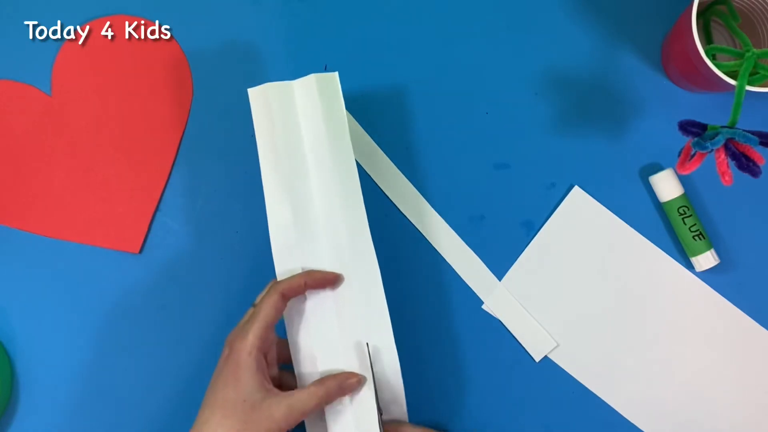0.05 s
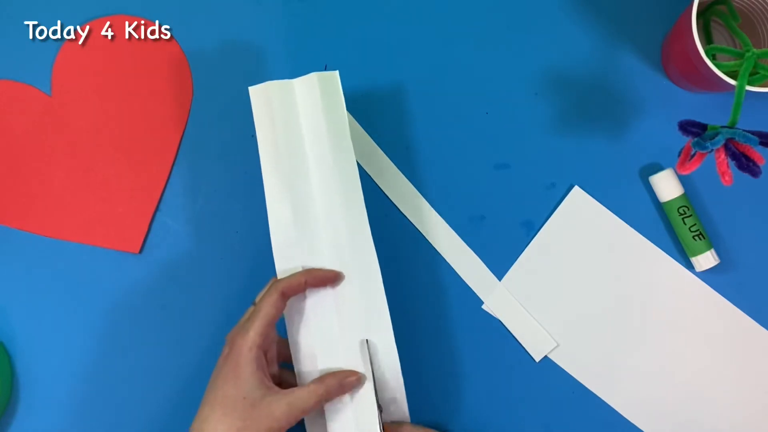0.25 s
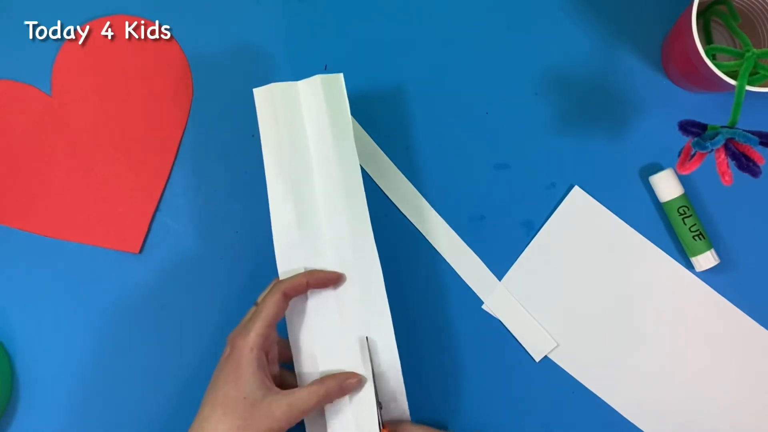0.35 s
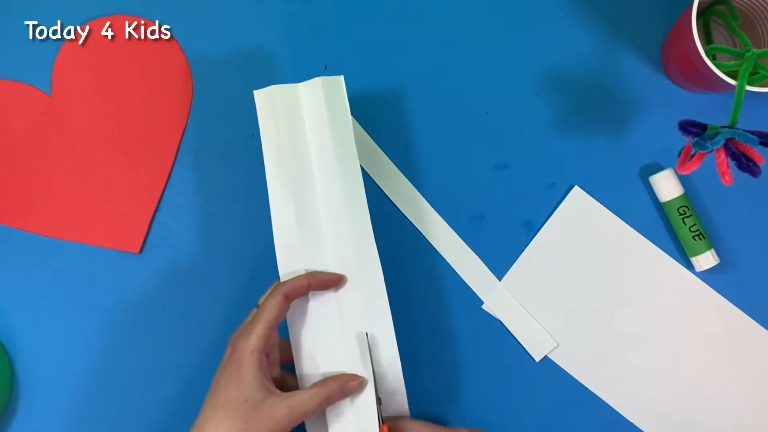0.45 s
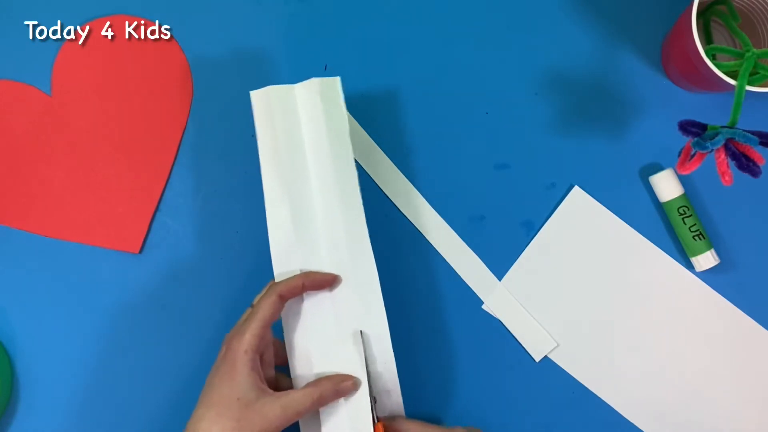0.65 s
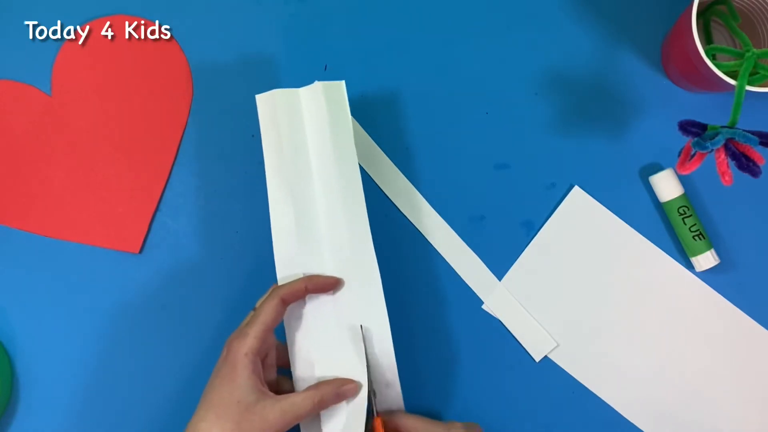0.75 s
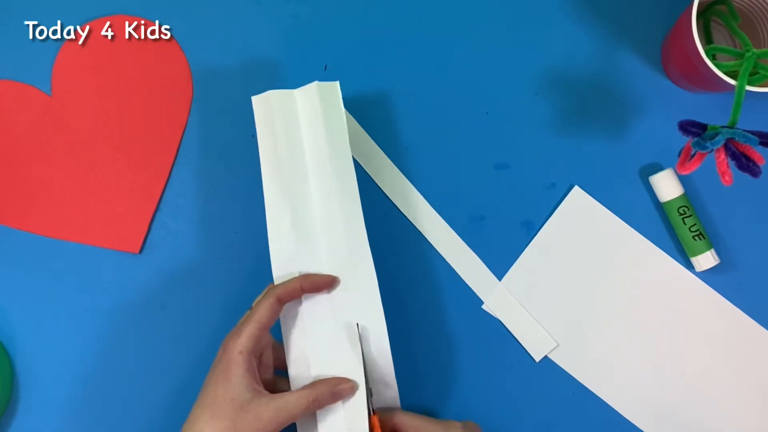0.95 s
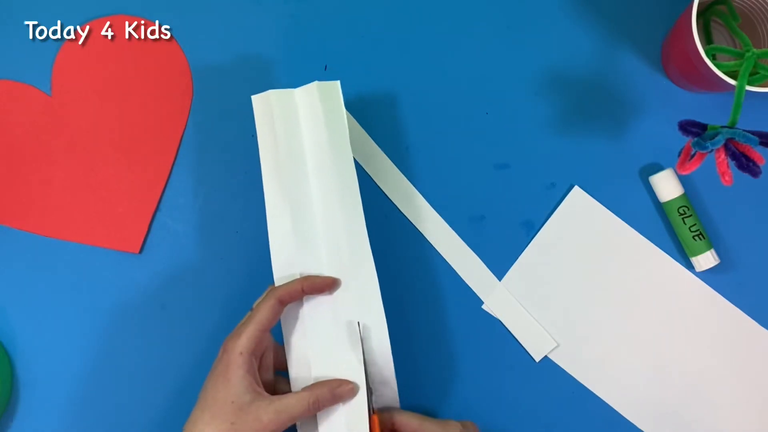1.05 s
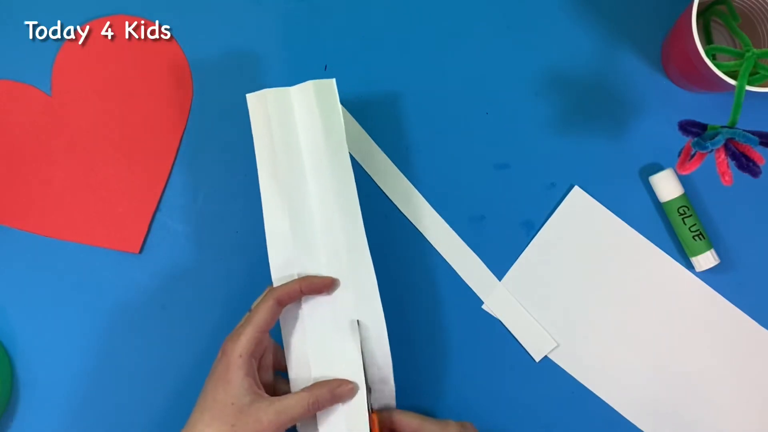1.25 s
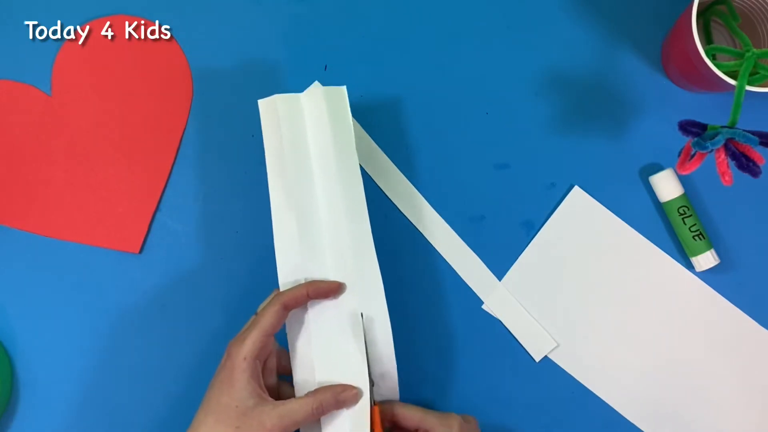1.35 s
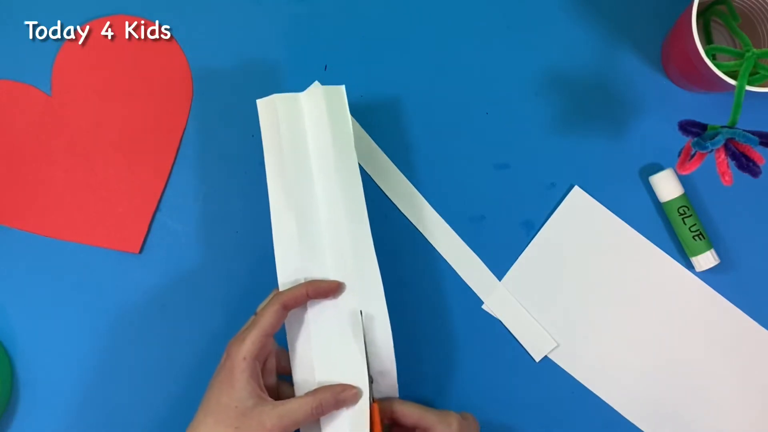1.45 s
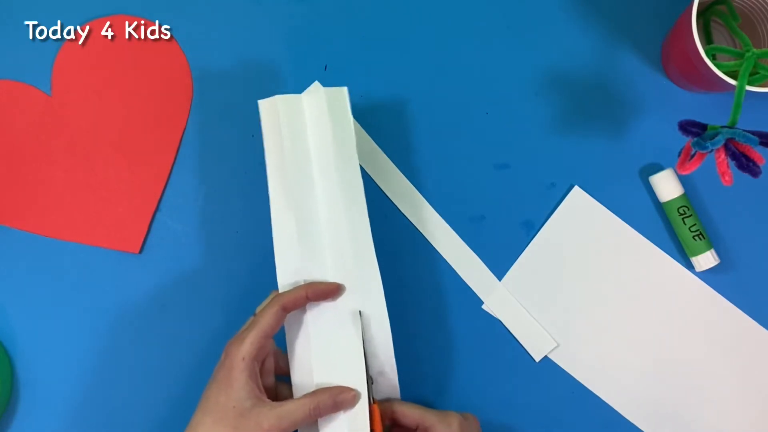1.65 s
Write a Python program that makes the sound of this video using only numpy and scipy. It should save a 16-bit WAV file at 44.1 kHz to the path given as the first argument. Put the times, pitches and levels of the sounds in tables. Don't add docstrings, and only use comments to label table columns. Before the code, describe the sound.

Scissors snip through folded paper in crisp irregular cuts, with metallic scrapes and one loud clack.

```python
import sys
import numpy as np
from scipy import signal
from scipy.fft import rfft, irfft, next_fast_len
from scipy.io import wavfile
from scipy.ndimage import uniform_filter1d

SR = 44100
rng = np.random.default_rng(int(sys.argv[2]) if len(sys.argv) > 2 else 0)


def elevation(decibels):
    levels = np.asarray(decibels, float)
    return 10 ** (levels / 20)


def generate_wav(sig):
    pcm = np.round(np.clip(np.atleast_2d(sig).T, -1, 1) * 32767).astype(np.int16)
    wavfile.write(sys.argv[1], SR, pcm)


N = 74970
T = np.arange(N) / SR

# (frequency [Hz], level [dB])
SCRAPE_COLOUR = [(150, -55), (350, -5.5), (1500, -0.5), (2700, -8), (4000, -5), (7500, -14), (9000, -12),
                 (16000, -17)]


def unit(x):
    return x / np.sqrt(np.mean(x ** 2))


def read(table, hz):
    table = np.array(table)
    return np.interp(np.log(hz + 1), np.log(table[:, 0] + 1), table[:, 1])


def colour(x, table):
    cepstrum = irfft(np.log(elevation(read(table, np.linspace(0, SR / 2, 1025)))))
    cepstrum[1:1024] *= 2
    cepstrum[1025:] = 0
    response = irfft(np.exp(rfft(cepstrum)))
    return signal.fftconvolve(x, response)[:len(x)]


def ring(x, hz, width):
    return signal.lfilter(*signal.iirpeak(hz, hz / width, SR), x)


def walk(rate):
    hold = int(SR / rate)
    steps = np.repeat(rng.standard_normal(N // hold + 1), hold)
    return unit(uniform_filter1d(steps, hold)[:N])


def grit(spread_db):
    return unit(rng.standard_normal(N) * elevation(spread_db * rng.exponential(size=N)))


def shape(t, attack, hold, t60):
    rise = np.clip(t / attack, 0, 1) ** 2
    return rise * elevation(-60 * np.clip(t - attack - hold, 0, 9) / t60)


def slides():
    # (time [s], level [dB])
    pressure = [
        [(0.12, -59), (0.128, -48), (0.138, -36.5), (0.174, -35), (0.22, -31.5), (0.238, -38)],
        [(0.262, -49), (0.27, -36), (0.286, -37), (0.305, -51)],
        [(0.435, -52), (0.459, -60.5), (0.477, -34.5), (0.517, -36), (0.525, -38.5), (0.563, -38),
         (0.568, -33.5)],
        [(0.582, -37), (0.588, -47), (0.604, -44), (0.606, -46.5)],
        [(0.662, -35), (0.736, -53.5), (0.75, -42)],
        [(0.778, -46), (0.79, -44.5), (0.796, -39.5), (0.854, -39), (0.872, -64.5), (0.878, -66)],
        [(1.074, -72), (1.086, -34.5), (1.092, -34), (1.164, -31.5), (1.262, -46)],
        [(1.452, -67), (1.456, -53), (1.486, -32), (1.598, -37), (1.638, -65), (1.65, -60)],
    ]
    # (frequency [Hz], width [Hz], level [dB])
    open_modes = [(560, 83, -8), (1000, 89, -3), (1232, 37, -0.5), (1910, 75, 2), (1994, 110, -3),
                  (3643, 104, -1.5), (6580, 280, 4), (7700, 760, -3.5)]
    force = np.zeros(N)
    for rows in map(np.array, pressure):
        force = np.maximum(force, elevation(np.interp(T, rows[:, 0], rows[:, 1], -120, -120)))
    force = uniform_filter1d(force, size=90) * elevation(-2.02 + 1.47 * walk(150))
    push = force * grit(2.3)
    rung = blades(push, open_modes, modes_db=-3.5, drift_db=3.6, sing_db=-5.5)
    direct = colour(push, SCRAPE_COLOUR) / np.std(colour(rng.standard_normal(N), SCRAPE_COLOUR))
    return rung + elevation(-3) * direct


def bites():
    # (time [s], level [dB], hold [s], brightness [dB])
    jerk_rows = [(.0, -18, 0.0087, -25), (0.017, -31, 0.0075, -23), (0.049, -23, 0.0038, -4.5),
                 (0.218, -25, 0.0058, 8.5), (0.279, -27.5, .002, 3), (0.285, -30, 0.0022, -13),
                 (.315, -18.5, .004, -0.5), (0.331, -22, 0.0097, -7), (0.351, -16.5, 0.003, -1.5),
                 (0.368, -32, 0.0081, 4), (0.381, -25, 0.003, 4.5), (0.524, -22, 0.0028, -9),
                 (0.64, -31, 0.0031, 1), (0.7533, -26, 0.0012, 5), (0.766, -32.5, 0.0017, 8),
                 (0.895, -37, .004, 4), (0.904, -26, 0.0034, 4.5), (0.921, -28.5, 0.016, 5.5),
                 (0.941, -29, 0.0103, 4), (.957, -18, 0.01, -4), (0.979, -26.5, 0.0062, 4),
                 (1.274, -19, 0.0035, -6), (1.29, -24.5, 0.016, 0.5), (1.313, -16, 0.0079, -5.5),
                 (1.327, -13, 0.0072, -7), (1.352, -17.5, 0.0065, -3.5), (0.792, -27.5, .003, 4),
                 (1.142, -28, .001, 0), (1.174, -29, .002, 1), (1.236, -31.5, 0.0045, -9),
                 (0.201, -32, 0.0033, 3), (1.16, -22, .002, 0), (1.455, -29.5, 0.00082, 0),
                 (1.466, -27, 0.00091, 2), (1.574, -27.5, .001, 0), (1.587, -25.5, 0.003, -5),
                 (1.591, -25.5, 0.0064, -3), (1.661, -23.5, 0.006, 3), (1.676, -19.5, 0.014, -1)]
    # (start [s], length [s], level [dB])
    drag_rows = [
        (0, 0.03, -42.5),
        (0.31, 0.093, -44),
        (0.884, 0.11, -48),
        (1.272, 0.091, -47.5),
        (1.659, .05, -42.5),
    ]
    # (frequency [Hz], width [Hz], level [dB])
    shut_modes = [(520, 83, -13.5), (821, 130, -13.5), (996, 99, -4.5), (1200, 140, 1), (1290, 120, -12),
                  (1910, 79, -7), (3115, 80, -10.5), (3420, 90, -6.5), (4970, 190, -24), (6360, 540, -15.5)]
    # (frequency [Hz], level [dB])
    tear_colour = [(150, -60.5), (350, -10), (1200, 2.5), (2600, -6.5), (3500, -4.5), (7500, -9),
                   (9000, -13), (16000, -18)]
    edge_s, attack_s, jerk_t60_s = 0.02, 0.0018, 0.022
    drag = sum(elevation(db) * shape(T - start + edge_s, edge_s, length, 0.077) for start, length, db in drag_rows)
    jerks, tearing = np.zeros(N), elevation(-3.0) * drag
    for start, db, hold, bright_db in jerk_rows:
        jerk = elevation(db - 16.5) * shape(T - start + attack_s / 2, attack_s, hold, jerk_t60_s)
        jerks += jerk
        tearing = tearing + elevation(bright_db) * jerk
    push = grit(2.22) * elevation(1.3 * walk(250))
    rung = blades((drag + jerks) * push, shut_modes, modes_db=-3.5, drift_db=1.8, sing_db=-5)
    return rung + unit(colour(push, tear_colour)) * tearing


def blades(push, modes, modes_db, drift_db, sing_db):
    def rung(x, drift):
        total = np.zeros(N)
        for hz, width, db in modes:
            level = elevation(db + drift * walk(25.35))
            bent_time = T + 0.0004 * walk(18)
            total += level * np.interp(bent_time, T, ring(x, hz, width))
        return total

    scale = np.std(rung(rng.standard_normal(N), 0))
    return elevation(modes_db) * rung(push, drift_db) / scale + elevation(sing_db) * sing(push)


def sing(x):
    # (start [s], length [s], from [Hz], to [Hz], level [dB])
    glides = [(0, 0.092, 1190, 1170, 2), (0, .06, 2200, 2030, -9.5), (0.12, 0.097, 1950, 1880, 4.5),
              (0.163, 0.08, 760, 768, -3), (0.186, .04, 3430, 3420, -1), (0.28, 0.027, 1950, 1890, 4),
              (0.308, 0.034, 1450, 1270, -2.5), (0.327, .065, 1260, 1125, 1),
              (0.787, 0.072, 3580, 3270, -2), (.33, 0.082, 760, 760, -5), (.42, .03, 700, 680, -3),
              (.47, 0.11, 2080, 1920, 3), (.48, .08, 3900, 3420, -3.5), (.52, 0.038, 840, 840, 5),
              (0.892, 0.091, 1050, 1144, -6), (1.078, .05, 2250, 1970, -3),
              (1.085, 0.047, 3980, 3900, -1.5), (1.134, 0.04, 1720, 1690, 4.5),
              (1.157, 0.032, 1880, 1900, 1), (1.105, 0.15, 1200, 1180, -6.5),
              (1.146, 0.055, 3800, 3740, -9), (1.081, .14, 5100, 4740, -14.5),
              (1.277, 0.027, 1050, 1036, 5.5), (1.306, 0.036, 1190, 1200, -0.5), (1.35, .03, 1050, 1000, 2),
              (1.456, 0.076, 2200, 2020, 0.5), (1.478, 0.061, 1000, 936, 2), (1.537, 0.066, 1900, 1870, 4),
              (1.474, .14, 520, 520, -3.5), (1.476, .12, 4900, 4820, -3), (1.48, 0.082, 3900, 3650, -4.5),
              (1.575, 0.041, 780, 690, 0.5), (1.661, 0.046, 1250, 1130, 0), (1.67, .04, 2250, 2150, -3)]
    edge_s = 0.008
    out = np.zeros(N)
    for start, length, hz0, hz1, db in glides:
        a, b = int(max(start - 2 * edge_s, 0) * SR), int((start + length + .05) * SR)
        t, width = T[a:b] - start, 25 + 0.018 * hz0
        turn = np.exp(2j * np.pi * np.cumsum(np.interp(t, [0, length], [hz0, hz1])) / SR)
        gate = np.clip(np.minimum(t, length - t) / edge_s + 1, 0, 1)
        narrow = signal.lfilter(*signal.butter(1, width / 2, fs=SR), gate * x[a:b] / turn)
        out[a:b] += elevation(db) * np.real(turn * narrow) * np.sqrt(SR / width / 2)
    return out


def clacks():
    # (time [s], peak level [dB], body [Hz], rise [s], hold [s])
    steel_hits = [
        (.2438, -12.5, 1820, 0.0013, 0.0062),
        (.6093, -11.5, 2680, 0.0017, 0.0009),
        (.6143, -13, 1790, 0.0015, .001),
        (.6418, 0, 1980, 0.0021, 0.0029),
    ]
    # (frequency [Hz], level [dB], t60 [s])
    steel_modes = [(520, -12.5, 0.037), (830, -14, .04), (1194, -5.5, 0.06), (1656, -14, .04),
                   (1930, -17, 0.047), (2290, -8.5, 0.046), (3200, -11, 0.04), (3644, -8.5, 0.04),
                   (4430, -9.5, 0.068), (4850, -9, 0.05), (7700, -2, 0.011)]
    # (frequency [Hz], level [dB])
    crack_colour = [(250, -30.5), (450, -6), (1300, -1.5), (2300, -2), (3000, -7), (4300, -5), (8000, -5.5),
                    (16000, -17)]
    return hits(steel_hits, steel_modes, crack_colour, t60=0.021,
                body_db=-14.5, steel_db=-6.0, broad_db=0.51, thud_db=-35)


def knocks():
    # (time [s], peak level [dB], body [Hz], rise [s], hold [s])
    handle_hits = [
        (.4058, -11.5, 657, 0.0024, 0.00042),
        (.571, -14.5, 900, 0.0016, 0.0012),
    ]
    # (frequency [Hz], level [dB], t60 [s])
    handle_modes = [(360, -10.5, 0.03), (700, -3.5, 0.013), (800, 1, 0.019), (1200, 1, .02),
                    (1690, 2, .018), (1950, -1.5, 0.012), (3500, -10.5, .03)]
    # (frequency [Hz], level [dB])
    knock_colour = [(200, -29), (380, -5.5), (800, -10.5), (2000, -6), (2700, -26.5), (3500, -15),
                    (5200, -29.5), (16000, -60)]
    sound = hits(handle_hits, handle_modes, knock_colour, t60=0.022,
                 body_db=-3.5, steel_db=-2, broad_db=-7.5, thud_db=-27.0)
    return signal.lfilter(*signal.butter(3, 4200, fs=SR), sound)


def hits(table, modes, broad, t60, body_db, steel_db, broad_db, thud_db):
    def steel(x):
        total = np.zeros(len(x))
        for hz, db, mode_t60 in modes:
            width = 2.2 / min(mode_t60, .05)
            total += elevation(db) * ring(x, hz, width) / np.sqrt(width)
        return total

    def crack(x):
        return colour(x, broad)

    def thud(x):
        return ring(ring(x, 85, 45), 80, 60)

    out = np.zeros(N)
    for start, db, body_hz, rise, hold in table:
        def body(x):
            return ring(ring(x, body_hz, 0.34 * body_hz), body_hz, 0.34 * body_hz)

        push, at = grit(2.5)[:SR // 5], int(start * SR)
        envelope = elevation(db - 8) * shape(T[:len(push)], rise, hold, t60)
        for part, part_db in ((body, body_db), (steel, steel_db), (crack, broad_db), (thud, thud_db)):
            out[at:at + len(push)] += elevation(part_db) * part(envelope * push) / np.std(part(push))
    return out


def sheet(rub):
    response = rng.standard_normal(SR // 10) * shape(T[:SR // 10], 0.00092, 0, 0.023)
    response = signal.lfilter(*signal.butter(2, 2600, "high", fs=SR), response)
    return elevation(-4) * signal.fftconvolve(rub, response / np.sqrt(np.sum(response ** 2)))[:N]


def glints(sound):
    moments = [.125, .29, .585, .75, .785, .895, .925, 1.08, 1.262, 1.452, 1.58]
    length_s = 0.036
    gate = sum(1. * (np.abs(T - start - length_s / 2) < length_s / 2) for start in moments)
    treble = signal.sosfilt(signal.butter(6, 6500, "high", fs=SR, output="sos"), sound)
    return elevation(-13) * uniform_filter1d(gate, size=400) * treble


def ports(sound):
    # (frequency [Hz], phase [rad])
    lead = [(0, 0), (350, 0), (860, -.75), (1250, -.2), (3100, .55), (5100, .1), (6900, np.pi),
            (7950, np.pi), (9300, 2 * np.pi), (11500, 6.6), (12600, 3 * np.pi), (14700, 3 * np.pi),
            (15800, 12.5)]
    # (frequency [Hz], level [dB])
    lean = [(350, 0), (750, 2), (1000, -3), (1600, 3), (2300, 2), (2700, -4.5), (4400, -3), (5000, 0)]
    size = next_fast_len(N + 4096)
    hz = np.linspace(0, SR / 2, size // 2 + 1)
    half = np.exp(.5j * np.interp(hz, *np.array(lead).T)) * elevation(read(lean, hz) / 2)
    return irfft(rfft(sound, size) * np.array([half, 1 / half]), size)[:, :N]


def room(near):
    tail = rng.standard_normal((3, SR // 2)) * shape(T[:SR // 2], 0.0018, 0, 0.14)
    tail[1:] = signal.lfilter(*signal.butter(4, 2270, fs=SR), tail[1:])
    levels = elevation(np.array([[-13.5], [-17.5], [-17.5]]))
    tail = tail * levels / np.sqrt(np.sum(tail ** 2, axis=1, keepdims=True))
    return signal.fftconvolve(near[None], tail, axes=1)[:, :N]


def hum():
    # (frequency [Hz], level [dB])
    rumble_colour = [(22, -15.5), (60, -6.5), (95, -1.5), (125, -15), (320, -21.5), (1000, -39.5),
                     (5000, -40.5), (9000, -72)]
    mid, side = (colour(rng.standard_normal(2 * N), rumble_colour)[N:] * elevation(0.53 * walk(5.2))
                 for _ in range(2))
    side = elevation(-5.5) * signal.lfilter(*signal.butter(2, 130, "high", fs=SR), side)
    return elevation(-58) * (mid + side * np.array([[1], [-1]])) / np.std(mid)


def scene():
    rub = slides() + bites()
    rub = signal.sosfilt(signal.ellip(8, .2, 60, 15600, fs=SR, output="sos"), rub)
    hit = clacks() + knocks()
    near = rub + hit + sheet(rub)
    echo, *dull_room = room(near)
    air = elevation(-70) * colour(rng.standard_normal(N), SCRAPE_COLOUR)
    centre = glints(near + echo) + elevation(-15.5) * hit
    return ports(near + echo + air) + np.array(dull_room) + hum() + centre


def low_pass(x):
    return signal.sosfilt(signal.butter(12, 16300, fs=SR, output="sos"), x)


def record(dry):
    mix = np.clip(dry, -1, 1)
    return low_pass(mix)


dry = scene()
out = record(dry)
generate_wav(out)
```